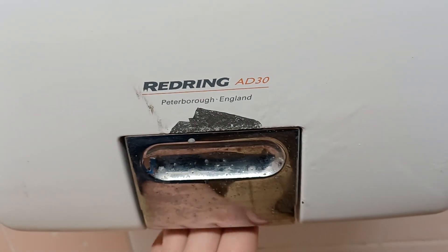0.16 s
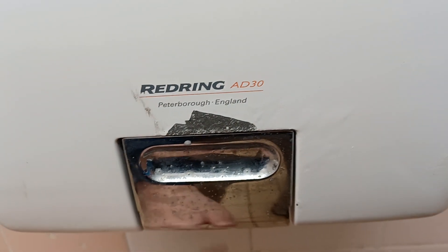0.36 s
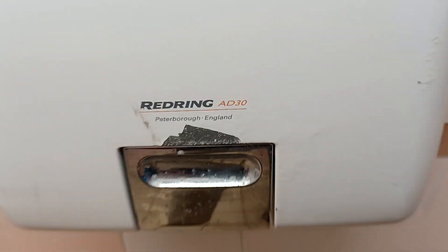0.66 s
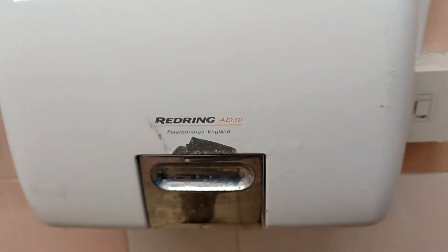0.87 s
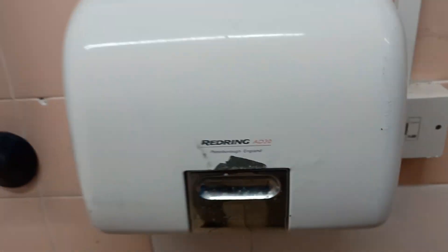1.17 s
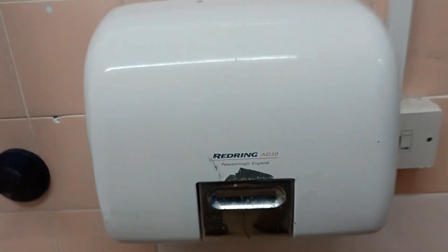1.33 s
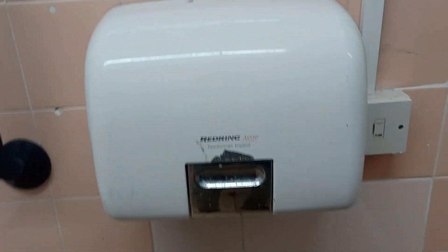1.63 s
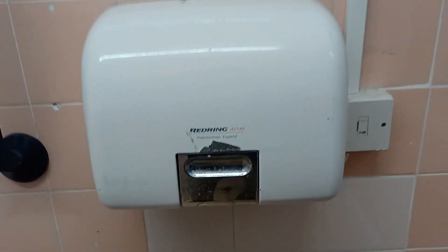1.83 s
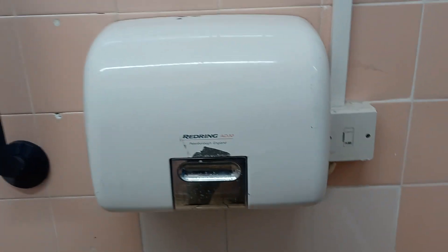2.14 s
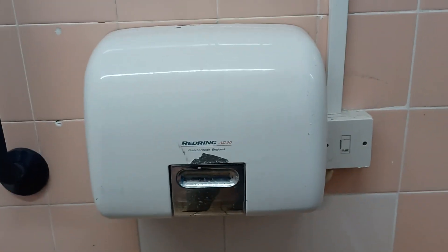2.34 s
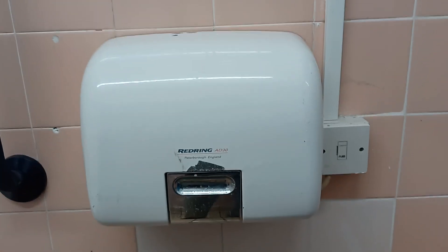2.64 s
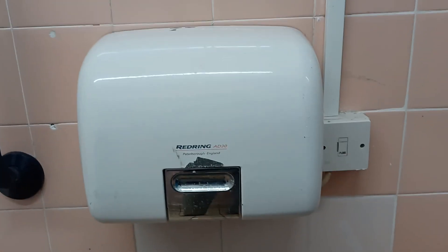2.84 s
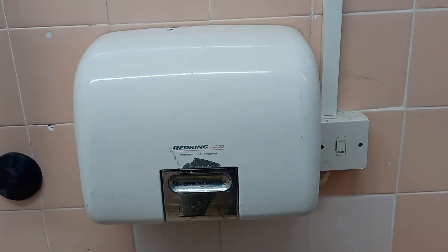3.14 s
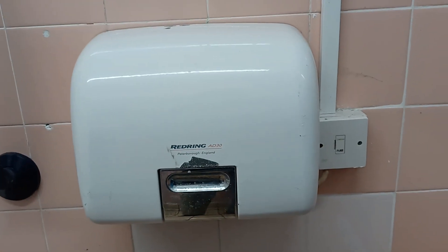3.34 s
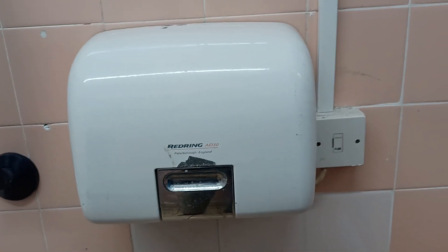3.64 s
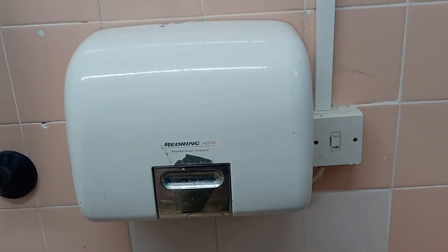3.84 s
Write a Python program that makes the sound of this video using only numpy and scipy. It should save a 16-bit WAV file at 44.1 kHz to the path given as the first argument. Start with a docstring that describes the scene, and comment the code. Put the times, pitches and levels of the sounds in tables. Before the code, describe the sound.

A hand dryer blows with a steady roar, hiss and fan hum in a small tiled washroom. The sound turns hollow as fingers cover the retreating microphone with one click. The dryer cuts out and fades, leaving faint ventilation.

```python
"""A wall-mounted hand dryer blows in a tiled washroom, then cuts out and coasts down.
Its turbulent air jet roars and hisses, and its humming fan drives the modes of the small room.
As the roar dies, it unmasks faint hollow resonances and a low ventilation drone.
The microphone backs away while fingers slide over its two ports and filter the sound:
the left turns hollow, the right clicks and goes dull."""
import sys
import numpy as np
from scipy import signal
from scipy.fft import rfft, irfft, next_fast_len
from scipy.io import wavfile
from scipy.ndimage import map_coordinates

SR = 44100
rng = np.random.default_rng(int(sys.argv[2]) if len(sys.argv) > 2 else 0)


def wrap_up_sound(samples):
    """Save the sound to the file named by the first command line argument, as 16-bit audio."""
    columns = np.atleast_2d(samples).T
    # keep every value between -1 and 1, then stretch to whole-number steps
    tamed = np.clip(columns, -1, 1)
    steps = np.round(tamed * 32767).astype(np.int16)
    wavfile.write(sys.argv[1], SR, steps)


N = 176400

# Spectra of the roar and the hiss. Each row: frequency in Hz, relative density in dB.
ROAR_SPECTRUM = [(30, -104), (52, -98), (75, -65), (130, -63), (230, -70), (380, -57), (540, -59),
                 (700, -53.5), (830, -53.5), (950, -56.5), (1100, -56.5), (1350, -58), (1650, -60),
                 (1900, -65.5), (2500, -64), (3000, -66), (4000, -69), (5500, -73), (9000, -105)]
HISS_SPECTRUM = [(1500, -100), (3500, -80), (5200, -72.5), (6600, -70.5), (7800, -77), (10500, -80),
                 (13500, -77), (15500, -79.5)]
# Faint whistles in the jet. Each row: centre in Hz, width in Hz, relative density in dB.
JET_WHISTLES = [(603, 6, -54), (726, 9, -50), (792, 9, -50), (858, 4, -46.5), (1029, 5, -52.5),
                (1114, 3, -46), (1690, 8, -58.5), (1988, 15, -61), (2057, 10, -59), (2657, 3, -65)]
# Envelopes of the roar and the hiss. Each row: time in seconds, gain in dB.
ROAR_GAIN = [(0, -1), (.7, -0.5), (1.15, .5), (1.45, 0), (2.0, -0.5), (2.38, 0.5), (2.52, -5.5),
             (2.68, -10), (2.82, -16.5), (3.15, -23.5), (3.5, -35.5), (4, -41)]
HISS_GAIN = [(0, -0.4), (1.2, 0.05), (2.42, -1.6), (2.6, -6), (2.85, -9.5), (3.15, -12), (3.42, -18.5),
             (4, -27)]
def air_jet(fizz_hz=10000, fizz_fall=1.27, flutter_db=0.42):
    """Turbulence radiates broadband noise; as the fan coasts, the roar dies first and the hiss dulls."""
    hiss, hiss_db = shaped_noise(HISS_SPECTRUM), curve(HISS_GAIN)
    fizz = filtered(hiss, lambda hz: 1 - 1 / (1 + (hz / fizz_hz) ** 10))  # top of the hiss
    roar = shaped_noise(ROAR_SPECTRUM, JET_WHISTLES) * amp(curve(ROAR_GAIN))
    air = roar + (hiss - fizz) * amp(hiss_db) + fizz * amp(fizz_fall * hiss_db)
    return air * amp(flutter_db * wobble(knots_per_s=8.5))


def tiled_room(x, t60_s=0.27, reverb_db=-7.5):
    """Reverberation: dense reflections off the tiles add an exponentially decaying tail."""
    t = np.arange(SR // 2) / SR
    tail = rng.standard_normal(len(t)) * amp(-60 * t / t60_s)
    tail = signal.lfilter(*signal.butter(2, 500, "high", fs=SR), tail / np.linalg.norm(tail))
    reflections = signal.fftconvolve(x, tail[None], axes=1)[:, :N]
    return (x + amp(reverb_db) * reflections) / np.sqrt(1 + amp(reverb_db) ** 2)


# Room modes. Each row: centre in Hz, width in Hz, relative density in dB close up, then a step back.
ROOM_MODES = [(76.4, 5.6, -67, -66), (106, 5.3, -52.5, -62), (135.3, 3.6, -45.5, -45),
              (147.4, 3.8, -46.5, -45), (177, 5.3, -40.5, -45.5), (192.7, 3.5, -40, -41),
              (210.6, 6.2, -43.5, -39.5), (227.4, 4.3, -40.5, -35.5), (257.2, 5.4, -41.5, -43.5),
              (271.9, 4.4, -51, -36), (296, 3.8, -44, -46), (325, 5.8, -49.5, -43), (353, 5.9, -51, -43),
              (423.3, 9.7, -47, -54), (444.6, 6, -66, -46), (481.7, 3.2, -44, -47.5)]
# Broad rumble close to the dryer. Each row: frequency in Hz, relative density in dB.
NEAR_SPECTRUM = [(40, -105), (75, -71), (130, -64), (220, -50), (300, -52), (450, -61), (620, -58.5),
                 (900, -99), (2000, -110)]
# Envelope of the rumble. Each row: time in seconds, gain in dB.
RUMBLE_GAIN = [(.03, 3), (.2, 0), (.37, 4), (.48, 1.5), (.8, 0.5), (1.05, 2), (1.38, -3.5), (1.6, -1),
               (1.75, -3.5), (1.9, 2.5), (2.0, -4), (2.13, -0.5), (2.45, -3.5), (2.58, -5), (2.67, -6),
               (2.78, -12.5), (2.98, -17), (3.12, -23), (3.5, -34), (4, -31)]
def fan_rumble(step_back_s=(0.46, 1.46)):
    """Standing waves vary with position: a step back trades broad rumble for a new balance of modes."""
    near = shaped_noise(NEAR_SPECTRUM, [(hz, width, db) for hz, width, db, _ in ROOM_MODES])
    far = ringing_noise([(hz, width, db) for hz, width, _, db in ROOM_MODES])
    crossfade = np.interp(np.arange(N) / SR, step_back_s, [0, np.pi / 2])
    return amp(curve(RUMBLE_GAIN)) * (np.cos(crossfade) * near + np.sin(crossfade) * far)


# Envelopes of the fan and motor tones. Each row: time in seconds, level in dB.
FAN_LEVEL = [(0, -29), (.35, -19.5), (.5, -27), (.65, -26), (.8, -34.5), (1.05, -31), (1.4, -49),
             (2.4, -37), (3, -84)]
MOTOR_LEVEL = [(0, -30), (.25, -31), (.55, -35.5), (.85, -36.5), (1.2, -68)]
def fan_hum(fan_hz=180.8, motor_hz=416, waver_db=1.2):
    """Periodic rotation radiates tones: the fan's hum, and a higher motor tone heard close up."""
    fan_db = curve(FAN_LEVEL) + waver_db * wobble(knots_per_s=11.7)
    return tone(fan_hz, fan_db, drift_rad=0.18) + tone(motor_hz, curve(MOTOR_LEVEL), drift_rad=0.78)


# Hollow resonances. Each row: centre in Hz, width in Hz, relative density in dB.
HOLLOW_RESONANCES = [(449, 9, -68.5), (485.5, 3.8, -68), (809, 6, -69.5), (839, 7.5, -69.5),
                     (1030, 21, -85), (1174, 14, -74.5), (1266, 7.9, -70), (1380, 7, -75), (1670, 20, -86),
                     (1946, 13, -83.5), (2016, 14, -85)]
# Their envelope. Each row: time in seconds, gain in dB.
HOLLOW_GAIN = [(2.3, -2), (2.9, 2), (3.2, 2), (3.5, 0), (4, -1)]
def hollow_ring():
    """Masking: narrow, nearly steady resonances stay hidden until the roar dies."""
    return amp(curve(HOLLOW_GAIN)) * ringing_noise(HOLLOW_RESONANCES)


# Air noise of the ventilation. Each row: frequency in Hz, density in dB per Hz.
VENT_SPECTRUM = [(30, -102), (50, -104), (75, -79), (110, -88), (150, -76), (300, -81), (400, -93),
                 (480, -88), (580, -88.5), (820, -74.5), (930, -83), (1150, -82.5), (1450, -86),
                 (1900, -92), (3300, -91.5), (5800, -95.5), (9000, -102), (11000, -111), (15500, -119)]
# Its resonances. Each row: centre in Hz, width in Hz, density in dB per Hz.
VENT_RESONANCES = [(222, 6.6, -61), (254, 10, -68.5)]
# Envelope of the drone. Each row: time in seconds, level in dB.
DRONE_LEVEL = [(2.4, -35.5), (2.9, -38.5), (3.1, -50), (3.22, -43), (3.45, -51), (3.65, -40.5), (3.82, -46),
               (4, -47.5)]
def ventilation(drone_hz=261):
    """Superposition: a low tone swells and sinks over soft, steady flow noise."""
    air = shaped_noise(VENT_SPECTRUM, VENT_RESONANCES)
    return air + tone(drone_hz, curve(DRONE_LEVEL), drift_rad=0.72)


# Finger on each port. Each row: time in seconds, cover (0 open, 1 covered, above 1 tighter still).
LEFT_SEAL = [(.7, 0), (.88, 0), (.95, 1.04), (1.15, 1.02), (1.4, 0.95), (1.7, 0.96), (2.1, 0.97), (4, 1.18)]
RIGHT_SEAL = [(.95, 0), (1.2, 0.1), (1.4, 0.24), (1.45, 1.2), (1.95, 1.3), (2.1, 0.74), (2.45, 0.92),
              (4, 1.27)]
# Responses of the ports, open and covered. Each row: frequency in Hz, gain in dB.
LEFT_OPEN_DB = [(300, -1), (1600, 1), (2200, -2), (3200, 0), (3800, -1), (5500, -2), (7000, -0.5),
                (9000, -1), (15000, 2)]
LEFT_COVERED_DB = [(300, -0.5), (600, 1), (800, -3.5), (1200, 3), (2500, -0.5), (3200, 2.5), (3750, -6),
                   (4800, 1.5), (5800, 13.5), (6400, 5), (7200, 2), (9300, 8), (11300, -5.5), (13500, 7),
                   (15500, 0)]
RIGHT_OPEN_DB = [(300, -0.5), (800, 1), (1600, 1), (2600, 3.5), (3800, 9.5), (5300, 2.5), (6500, 6.5),
                 (7700, -2.5), (10500, 2.5), (15000, 0)]
RIGHT_COVERED_DB = [(300, 0.5), (800, 1.5), (1600, -0.5), (2600, 4), (3500, 7), (4500, -0.5), (5500, -7.5),
                    (6500, -24), (7600, -16), (9200, -5.5), (11500, -2), (13500, -4), (15500, -37)]
# The left port's resonances settle as the finger presses. Each row: time in seconds, frequency ratio.
LEFT_TUNING = [(.93, 1.06), (1.35, 0.999)]
# Air pocket under the left finger. Each row: time in seconds, resonance in Hz, peak gain in dB.
AIR_POCKET = [(.7, 2450, 0), (.86, 2630, 7.5), (.95, 3060, 13), (1.04, 2730, 16.5), (1.2, 2525, 16.5),
              (1.4, 2200, 14), (1.7, 2040, 13.5), (2.1, 1905, 11.5), (2.6, 1875, 11.5), (4, 1920, 11.5)]
def covered_ports(x, pocket_width_octaves=0.25):
    """Cavity resonance: fingers colour both ports, and the left pocket rings lower as its gap closes."""
    hz, t, spectra = signal.stft(x, SR, nperseg=512)
    hz = hz[:, None]

    def port_db(seal, open_db, covered_db, tuning=1):
        cover = curve(seal, t)
        return (1 - cover) * spectrum_at(open_db, hz) + cover * spectrum_at(covered_db, hz / tuning)

    times, pocket_hz, peak_db = np.transpose(AIR_POCKET)
    octaves = np.log2((hz + 1) / np.interp(t, times, pocket_hz))
    pocket_db = np.interp(t, times, peak_db) / (1 + (octaves / pocket_width_octaves) ** 2)
    left_db = port_db(LEFT_SEAL, LEFT_OPEN_DB, LEFT_COVERED_DB, curve(LEFT_TUNING, t)) + pocket_db
    right_db = port_db(RIGHT_SEAL, RIGHT_OPEN_DB, RIGHT_COVERED_DB)
    return signal.istft(spectra * amp([left_db, right_db]), SR, nperseg=512)[1][:, :N]


def finger_click(at_s=1.3769, swing_s=0.00028, crack_s=0.0005):
    """A pressure transient: a finger shuts the right port with one sharp swing and a brief crack."""
    t = np.arange(N) / SR - at_s
    u = t / swing_s
    swing = signal.lfilter(*signal.butter(1, 200, "high", fs=SR), amp(8) * u / (1 + u ** 2) ** 2)
    noise = signal.lfilter(*signal.butter(2, (1000, 3500), "band", fs=SR), rng.standard_normal(N))
    crack = amp(-6) * noise * np.exp(-np.abs(t / crack_s + 1))
    return np.outer([0, 1], swing + crack)


def noise_field(density, spacing_m=0.17, left_lead_s=0.000368, direct_db=-10):
    """Spatial coherence: two ports share the diffuse bass; direct treble reaches the left first."""
    size = next_fast_len(N, True)
    hz = np.fft.rfftfreq(size, 1 / SR)
    mid, side, direct = rng.standard_normal((3, 2 * len(hz))).view(complex)
    coherence = 0.96 * np.sinc(2 * hz * spacing_m / 343)
    mid, side = np.sqrt((1 + coherence) / 2) * mid, np.sqrt((1 - coherence) / 2) * side
    direct_gain = amp(direct_db) * hz ** 2 / (hz ** 2 + 700 ** 2)
    lead = direct_gain * np.exp(1j * np.pi * hz * left_lead_s)
    pair = np.array([mid + side + direct * lead, mid - side + direct * lead.conj()])
    gain = np.sqrt(density(hz) / (1 + direct_gain ** 2))
    return irfft(pair * gain, size)[:, :N] * np.sqrt(SR * size) / 2


def shaped_noise(spectrum, modes=()):
    """Incoherent powers add: broad noise with resonances standing out of it."""
    return noise_field(lambda hz: amp(2 * spectrum_at(spectrum, hz)) + mode_power(hz, modes))


def ringing_noise(modes):
    """Resonators under random excitation give narrow bands of noise."""
    return noise_field(lambda hz: mode_power(hz, modes))


def mode_power(hz, modes):
    """Resonance: each mode's power falls steeply on both sides of its centre."""
    return sum(amp(2 * db) / (1 + ((hz - centre) / width) ** 2) ** 2 for centre, width, db in modes)


def tone(hz, level_db, drift_rad):
    """Phase modulation: a sinusoid drifts slightly at random."""
    phase = 2 * np.pi * hz * np.arange(N) / SR + drift_rad * wobble(knots_per_s=8.7)
    return np.sqrt(2) * amp(level_db) * np.sin(phase)


def wobble(knots_per_s):
    """Slow fluctuation: a spline through random knots."""
    t = np.linspace(0, N / SR, 800)
    spline = map_coordinates(rng.standard_normal(256), [t * knots_per_s])
    return np.interp(np.arange(N) / SR, t, spline)


def amp(db):
    """Decibels to amplitude ratio."""
    return 10 ** (np.asarray(db) / 20)


def spectrum_at(rows, hz):
    """Interpolation on a logarithmic frequency axis."""
    row_hz, row_db = np.transpose(rows)
    return np.interp(np.log(hz + 1), np.log(row_hz + 1), row_db)


def curve(rows, t=None):
    """Linear interpolation in time."""
    return np.interp(np.arange(N) / SR if t is None else t, *np.transpose(rows))


def filtered(x, response):
    """Linear filtering: the spectrum times a frequency response."""
    size = next_fast_len(N + 2048, True)
    return irfft(rfft(x, size) * response(np.fft.rfftfreq(size, 1 / SR)), size)[..., :N]


def scene():
    """Superposition: the pressures of dryer, room and ventilation add at the microphone."""
    return tiled_room(air_jet()) + fan_rumble() + fan_hum() + hollow_ring() + ventilation()


def record(dry):
    """Band limiting: the covered ports' sound and the click are cut off at 15.8 kHz."""
    return filtered(covered_ports(dry) + finger_click(), lambda hz: hz < 15800)


dry = scene()
out = record(dry)
wrap_up_sound(out)
```